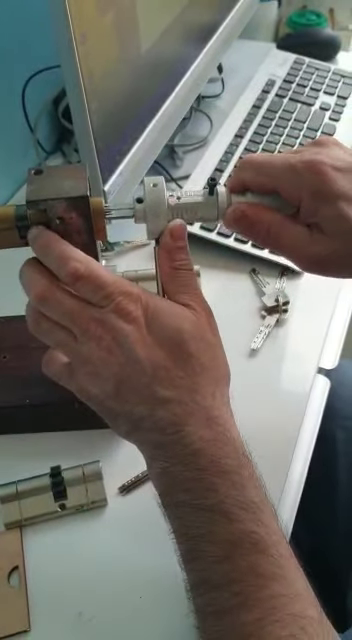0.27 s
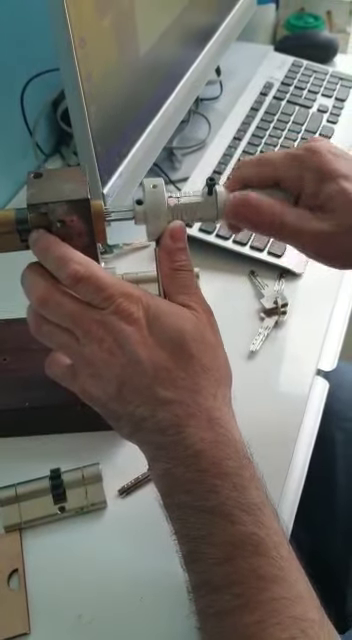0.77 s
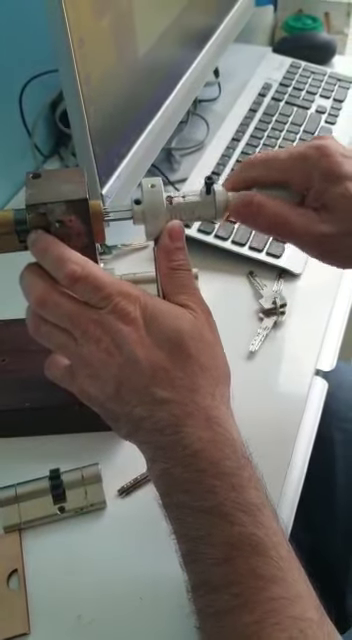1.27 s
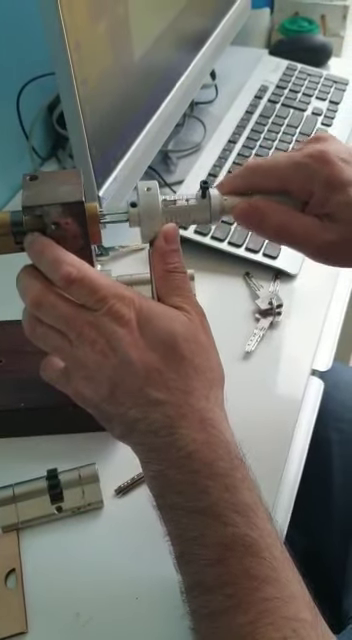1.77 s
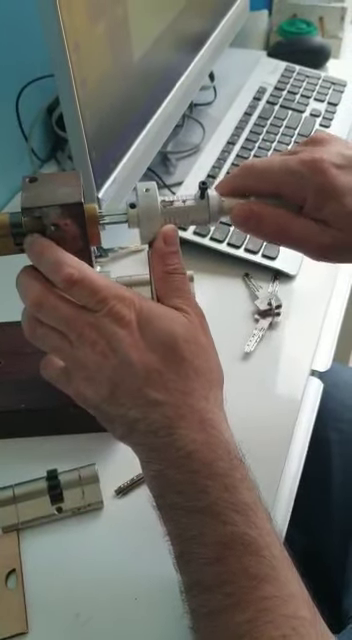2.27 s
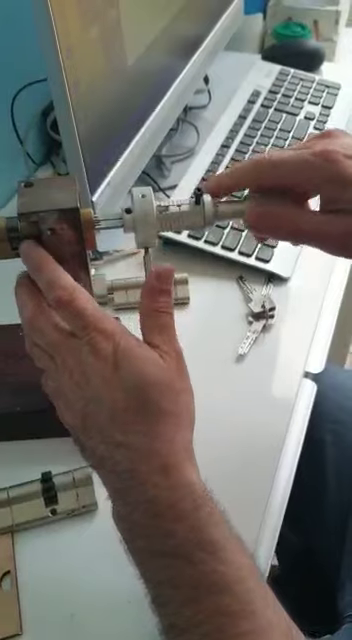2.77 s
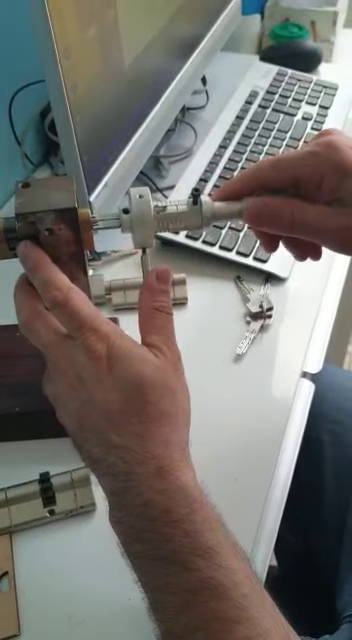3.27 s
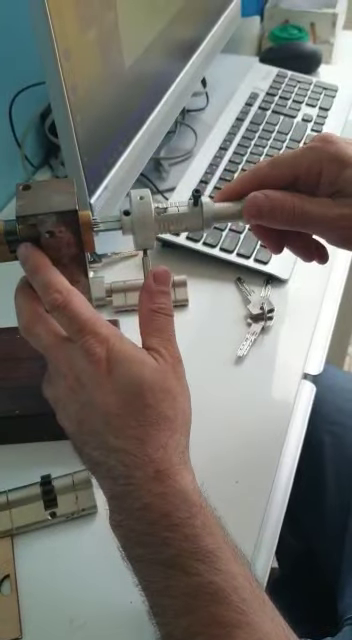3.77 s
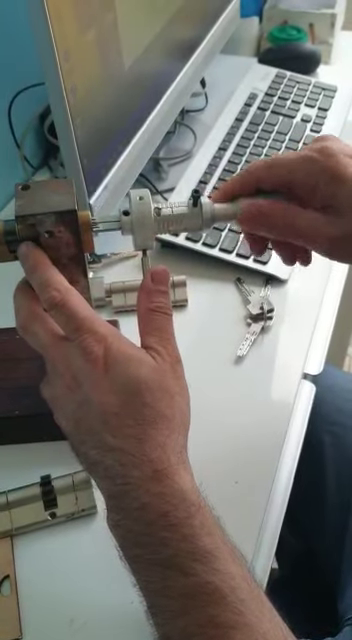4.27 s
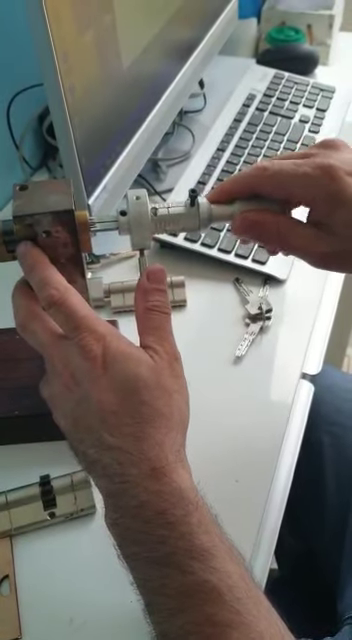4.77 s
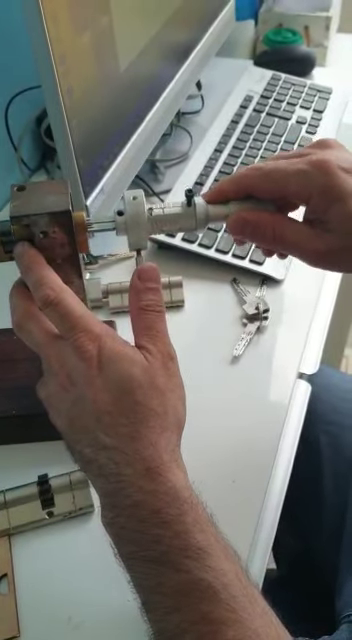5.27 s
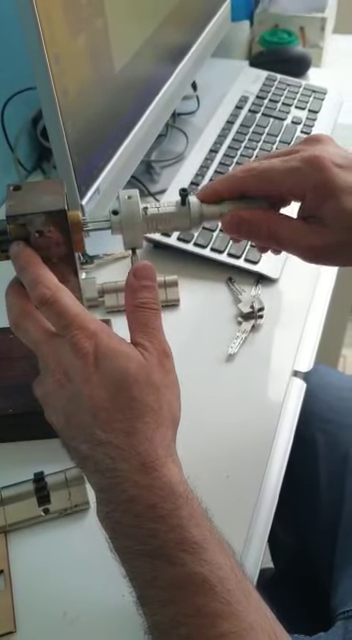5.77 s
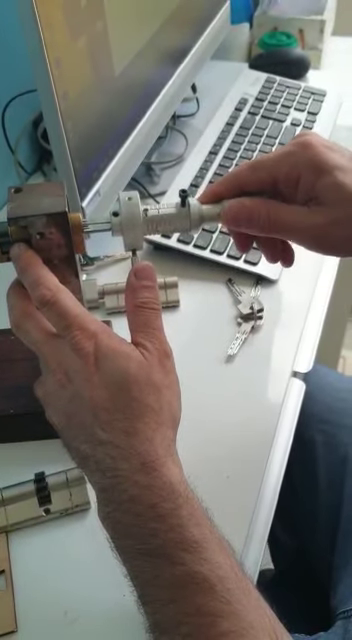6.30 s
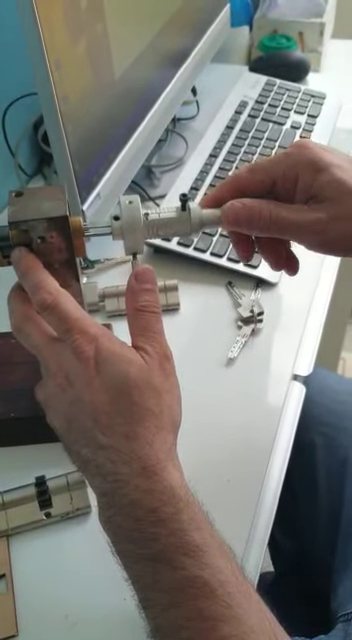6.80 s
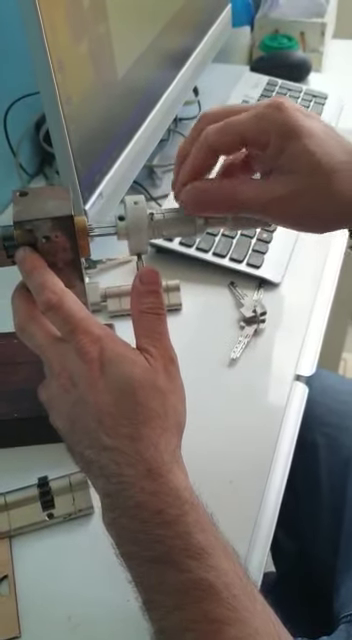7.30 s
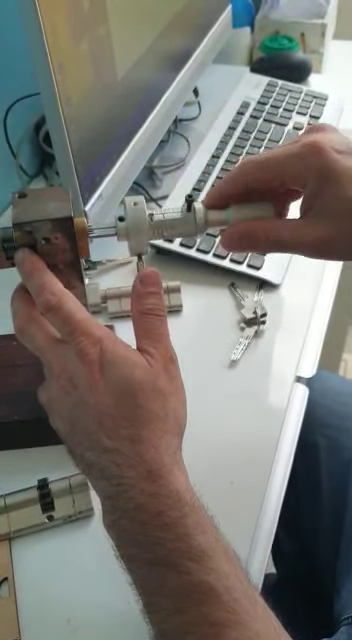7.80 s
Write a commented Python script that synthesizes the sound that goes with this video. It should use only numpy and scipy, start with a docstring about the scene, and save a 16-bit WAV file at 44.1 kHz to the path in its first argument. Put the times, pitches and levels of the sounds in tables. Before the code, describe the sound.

A pick tool works inside a metal lock cylinder in a small room. Pins land with sharp, lightly ringing clicks, and the shaft rubs with a thin squeal. A run of short high squeaks and a dry scrape follows, then more scattered squeaks and clicks. The sounds are close, with a brief echo. A fan hums throughout, and faint low engine drones come and go outside.

```python
"""At a desk in a small room, a pick tool is worked inside a lock cylinder held in a vice.
A fan hums throughout over soft room noise, and low drones, like engines outside, come and go.
Each push of the hand builds and lets go: the shaft rubs, the pick scrapes, and steel sticks and
slips on brass so quickly that it squeaks. Pins land with clicks that set the lock ringing.
The sounds of the lock bounce briefly around the room and reach two microphones."""
import sys
import numpy as np
from scipy import signal
from scipy.fft import rfft, irfft, next_fast_len
from scipy.io import wavfile

SR = 44100
rng = np.random.default_rng(int(sys.argv[2]) if len(sys.argv) > 2 else 0)


def wav_record(signal):
    """Record a signal, one row per channel, as 16-bit PCM in the file named by sys.argv[1]."""
    frames = np.transpose(np.atleast_2d(signal))
    bounded = np.clip(frames, -1, 1)
    # unit amplitude maps onto the largest positive 16-bit level
    quanta = np.round(bounded * 32767).astype(np.int16)
    wavfile.write(sys.argv[1], SR, quanta)


N = 354696

# Levels in these tables are relative: the functions turn each layer up or down as a whole.
# The fan's steady tones. Each row: pitch in Hz, level in dB.
FAN_TONES = [(62, -56.5), (122, -56), (156, -57.5), (240, -67.5), (304, -69), (366, -70), (376, -70.5),
             (424, -67), (483, -71.5), (544, -73), (596, -73)]
# How the fan's main tone swells and dips. Each row: time in seconds, level in dB.
FAN_SWELL = [(0.0, -54.5), (0.76, -62.5), (1.16, -49), (2.28, -53.5), (2.51, -71.5), (3.52, -49.5),
             (4.32, -50), (5.01, -69), (5.49, -49), (6.02, -63.5), (6.56, -51), (8.04, -50.5)]
# An engine outside idles, then speeds up. Each row: time in seconds, crank turns per second.
ENGINE_SPEED = [(0.0, 37.1), (0.33, 40.96), (1.72, 40.38), (1.81, 39.0), (2.8, 41.0), (2.89, 38.46),
                (3.56, 39.45), (3.76, 44.9), (4.86, 51.72), (5.42, 50.15), (5.98, 54.68), (6.07, 59.95),
                (6.7, 62.12), (8.04, 60.46)]
# How loud the engine is. Each row: time in seconds, level in dB.
ENGINE_LEVEL = [(0.0, -58.5), (0.51, -55), (2.75, -49.5), (3.24, -38), (3.31, -43.5), (3.74, -36.5),
                (3.83, -51), (6.45, -45.5), (6.49, -36), (6.81, -33), (7.03, -41.5), (7.63, -37.5),
                (7.7, -53), (7.9, -36), (8.04, -53)]
# The engine's tones. Each row: multiple of the crank speed, level in dB.
ENGINE_TONES = [(1, -6.5), (2, 1), (3, 3.5), (4, -7.5)]
# What the walls let through. Each row: frequency in Hz, gain in dB.
WALLS = [(38, -6), (62, 1.5), (80, -5), (100, 1), (122, -1), (138, 0.5), (160, -6), (185, -20.5),
         (245, -14)]
# Other low drones. Each row: start, rise and fade in seconds, first and last pitch in Hz, level in dB.
DRONES = [(0, 0.16, 4.5, 99.5, 96.3, -48.5), (2.401, .45, 0.24, 70, 65.5, -47.5),
          (3.0, .25, 1.4, 36.63, 51.94, -43.5), (4.4, .45, 1.1, 53.46, 86.4, -39.5)]
# The deep part of the room noise. Each row: frequency in Hz, level in dB.
RUMBLE_COLOUR = [(20, -36.5), (32, -21), (45, 8), (70, 12), (95, 5.5), (125, 8.5), (155, 13.5), (175, -1.5),
                 (205, -24.5), (300, -50)]
# The airy part of the room noise. Each row: frequency in Hz, level in dB.
AIR_COLOUR = [(100, -0.5), (210, -1), (400, -3.5), (560, -6.5), (750, -9.5), (930, -7), (1050, -13),
              (1200, -8.5), (1650, -16), (2100, -29.5), (3200, -36), (9000, -54), (11500, -38),
              (16000, -38)]
# How alike that noise is left and right. Each row: frequency in Hz, likeness from 0 to 1.
LIKENESS = [(30, .99), (70, 0.63), (140, 0.96), (250, 0.73), (500, 0.41), (1000, 0.0046), (16000, 0)]
# The shaft slides in its sleeve. Each row: start, build and let-go in seconds, level in dB.
SLIDES = [(0, 0.0076, 0.35, -71.5), (.19, 0.027, 0.3, -73.5), (1.24, 0.14, 0.21, -58),
          (1.5, 0.22, .08, -67.5), (2.25, 0.09, 1, -74), (4.36, 0.11, 0.43, -65.5), (4.6, 0.29, 0.15, -64),
          (7.1, 0.15, 0.35, -65.5)]
# The hiss of that sliding. Each row: frequency in Hz, level in dB.
SLIDE_COLOUR = [(700, -1), (1100, 16.5), (1800, 2), (2400, 5), (2850, -5.5), (3300, -1), (3900, 2.5),
                (5000, 11.5), (7000, -1.5), (8500, -28), (11000, -22), (16000, -32)]
# Pins clicking. Each row: start in seconds, then levels in dB of the ring, low knock and bright edge.
CLICKS = [(0.1812, -60.5, -68, -83), (.224, -45, -50.5, -65), (0.548, -71, -64, -79),
          (0.741, -77, -67, -76), (1.004, -71, -71.5, -68), (1.376, -73, -58, -55),
          (1.4482, -44, -63, -41.5), (2.596, -44.5, -51, -37), (2.8652, -50.5, -49.5, -66),
          (3.9644, -65.5, -67, -51), (6.46, -49.5, -53.5, -53), (6.47, -50, -57.5, -53),
          (6.9837, -59.5, -54, -72), (6.992, -62, -61, -68), (7.0052, -59.5, -55, -68),
          (7.014, -53, -60, -57), (7.2444, -77, -72, -68)]
# The notes that tool and lock ring at. Each row: pitch in Hz, width in Hz, level in dB.
LOCK_RING = [(840, 430, 1), (1165, 120, 8.5), (2360, 300, 7), (3903, 810, 5.5), (5430, 300, -4.5),
             (5800, 79, 5.5), (7450, 1800, 0.5), (8064, 130, 1), (10590, 1400, -17), (11940, 760, -0.5),
             (14600, 620, 5.5), (15620, 900, -2)]
# Faint squeals of the sliding shaft. Each row: start, build and let-go in seconds,
# first, full-pressure and last pitch in Hz, level in dB, roughness (0 is smooth).
SQUEALS = [ (1.208, 0.048, 0.025, 2020, 2390, 2590, -68, 0), (1.235, 0.13, .14, 3590, 3344, 3350, -57, .8),
           (1.51, .095, 0.027, 2550, 2495, 2470, -66, 0.2), (1.595, .045, .15, 2550, 2356, 2199, -66.5, 0),
           (4.42, .03, .22, 2570, 2430, 2007, -63, 0.5), (4.46, .05, .25, 3300, 3200, 3000, -72.5, 0.4),
           (4.76, 0.12, .09, 4030, 3820, 3750, -72, 0.05),
           (4.762, 0.086, 0.13, 3160, 3230, 3180, -66.5, 0.23),
           (7.11, 0.055, 0.134, 2400, 2220, 2130, -68, 0.2), (7.16, 0.11, 0.34, 3280, 3160, 3080, -72, 0.3),
           (7.36, .08, 0.21, 2607, 2518, 2360, -72.5, 0.04)]
# Squeaks of steel on brass. Each row: the same eight values as a squeal,
# then the change in dB from one overtone to the next, and the pick's ring in dB.
SQUEAKS = [ (1.445, 0.0067, 0.006, 1685, 2040, 2234, -28, 1.06, 0.6, -11.5),
           (1.705, 0.014, 0.028, 3865, 3927, 3860, -21, 0.07, -4.5, -33),
           (3.111, 0.016, 0.035, 2530, 2980, 3020, -35, 0.92, -1, -5),
           (3.239, 0.024, 0.025, 2790, 3248, 3060, -40, 0.79, -3.5, -29),
           (3.371, 0.023, 0.027, 2850, 2650, 2916, -38, 0.59, -1, -21),
           (4.037, 0.006, 0.025, 2700, 2656, 3010, -42.5, 0.78, .5, 7),
           (4.263, .04, 0.0565, 2814, 3080, 2974, -30.5, .55, 0.5, -12),
           (4.356, 0.0204, 0.03, 2600, 2450, 2528, -39, 1.06, 0, -17),
           (4.385, 0.011, 0.028, 2580, 2470, 2580, -46, 1.23, -9, -2.5),
           (6.034, 0.011, 0.011, 3833, 3890, 3770, -36.5, .06, -13, -45),
           (6.117, 0.0069, 0.023, 3890, 3730, 3770, -30, 0.12, -6.5, -45),
           (6.264, 0.0041, .008, 3813, 3770, 3850, -49.5, .06, -13, -34),
           (6.342, 0.0084, 0.013, 3820, 3770, 3680, -44.5, 0.15, -14, -37),
           (6.982, .004, .014, 2691, 2701, 2740, -59, 1, -2, 10),
           (7.004, .004, 0.012, 2700, 2760, 2670, -54, 1, 7, 6.5)]
# How well the tool gives off a squeak's overtones. Each row: frequency in Hz, gain in dB.
SQUEAK_COLOUR = [(1900, -6.5), (2700, -11.5), (3050, -0.5), (3900, -2), (4800, -0.5), (5400, -3), (6100, 3),
                 (7600, -1), (8250, -2.5), (9000, -21), (11000, -16), (12000, -9.5), (13500, -9.5),
                 (15600, -3), (17500, -45)]
# The pick's own ring under a squeak. Each row: pitch in Hz, width in Hz, level in dB.
PICK_RING = [(2950, 400, -9), (8270, 110, 7), (11000, 500, -9), (15000, 300, -11)]
# Short dry scrapes of the pick. Each row: start, build and let-go in seconds, level in dB.
SCRAPES = [(3.53, 0.021, 0.15, -52.5), (3.96, 0.079, .015, -72), (4.378, 0.0036, 0.023, -52)]
# The hiss of those scrapes. Each row: frequency in Hz, level in dB.
SCRAPE_COLOUR = [(500, 0.5), (1500, 3.5), (2600, -0.5), (3300, -5), (4300, 4), (5500, -4), (7600, 1.5),
                 (8700, -15.5), (10500, -7), (13000, -20), (16000, -22)]
# How long the room echoes. Each row: frequency in Hz, seconds to fade by 60 dB.
ROOM_FADE = [(1000, .38), (4000, .3), (6000, .26), (12000, .24), (16000, .21)]
# The right microphone is shaded from the tool. Each row: frequency in Hz, gain in dB.
RIGHT_SHADE = [(1000, 5.5), (2000, 3), (3000, 1.5), (3850, -3), (4500, -4), (5400, -14), (6500, -13.5),
               (8400, -14), (9600, 2), (11000, 2.5), (13000, -13), (16000, -8)]


def from_db(db):
    """Turn decibels into a number to multiply by."""
    return 10 ** (np.asarray(db) / 20)


def unit_level(x):
    """Scale a sound so that its average strength (rms) is 1."""
    return x / np.sqrt(np.mean(x ** 2) + 1e-20)


def in_time(rows):
    """Join (time, value) points with straight lines, giving a value for every sample."""
    return np.interp(np.arange(N) / SR, *np.transpose(rows))


def at_hz(points, hz):
    """Read between (frequency, value) points, with every octave equally wide."""
    f, value = np.transpose(points)
    return np.interp(np.log(np.maximum(hz, 1)), np.log(f), value)


def coloured(x, colour):
    """Turn each frequency of a sound up or down by a curve in dB."""
    size = next_fast_len(x.shape[-1] + 2048)
    gain = from_db(at_hz(colour, np.fft.rfftfreq(size, 1 / SR)))
    return irfft(rfft(x, size) * gain, size)[..., :x.shape[-1]]


def drift(rate, size=N):
    """A random wobble of about 1 either way, with `rate` new values a second."""
    return np.interp(np.arange(size) / SR * rate, np.arange(8192), rng.standard_normal(8192))


def resonance(x, hz, width_hz):
    """Let a sound ring at one pitch; a narrower width rings longer."""
    r = np.exp(-np.pi * width_hz / SR)
    feedback = [1, -2 * r * np.cos(2 * np.pi * hz / SR), r * r]
    return signal.lfilter(np.array([1, 0, -1]) * (1 - r * r) / 2, feedback, x + 1e-18)


def add(out, start_s, sound):
    """Mix a sound in at its start time."""
    at = round(start_s * SR)
    out[at:at + len(sound)] += sound[:N - at]


def push(build_s, let_go_s):
    """A curve from 0 to 1 and back, like a hand's pressure, and flags for where it is rising."""
    up, down = [np.linspace(0, 1, int(s * SR)) for s in (build_s, let_go_s)]
    pressure = np.concatenate([up ** .65, down[::-1] ** .9])
    return pressure, np.arange(len(pressure)) < len(up)


def tone(hz, level_db):
    """A pure tone whose pitch and level can change at every sample."""
    return np.sqrt(2) * from_db(level_db) * np.sin(2 * np.pi * np.cumsum(hz) / SR)


def fan(main_hz=182.9, wander=.005, waver_db=1.3):
    """A fan hums with several tones, each wavering a little in pitch and level."""
    tones = [*FAN_TONES, (main_hz, in_time(FAN_SWELL) - 1)]
    return sum(tone(level_db=db + waver_db * drift(2.4), hz=hz * (1 + wander * drift(4)))
               for hz, db in tones)


def engine(gain_db=-4, throb_db=2):
    """An engine's low tones follow its crank, each louder where the walls let it through."""
    crank_hz, level_db = in_time(ENGINE_SPEED), in_time(ENGINE_LEVEL) + gain_db
    return sum(tone(k * crank_hz, level_db + db + at_hz(WALLS, k * crank_hz) + throb_db * drift(15))
               for k, db in ENGINE_TONES)


def drones(throb_db=1.5):
    """Single low notes swell, glide evenly and fade."""
    out = np.zeros(N)
    for start_s, rise_s, fade_s, first_hz, last_hz, level_db in DRONES:
        swell, _ = push(rise_s, fade_s)
        glide_hz = np.geomspace(first_hz, last_hz, len(swell))
        add(out, start_s, swell * tone(glide_hz, level_db + throb_db * drift(17, len(swell))))
    return out


def room_noise(colour, start_db, rise_db_per_s):
    """Slowly growing noise from all around: alike on both sides in the bass, unrelated higher up."""
    size = next_fast_len(N)
    hz = np.fft.rfftfreq(size, 1 / SR)
    shared, opposite = rfft(rng.standard_normal((2, size)))
    alike = at_hz(LIKENESS, hz)
    pair = np.sqrt(1 + alike) * shared + np.sqrt(1 - alike) * opposite * [[1], [-1]]
    noise = irfft(pair * from_db(at_hz(colour, hz)), size)[:, :N]
    return unit_level(noise) * from_db(start_db + rise_db_per_s * np.arange(N) / SR)


def rub(pushes, colour, grain_db, gain_db):
    """Sliding metal hisses with a fine uneven grain, louder the harder it is pressed."""
    force = np.zeros(N)
    for start_s, build_s, let_go_s, level_db in pushes:
        add(force, start_s, from_db(level_db) * push(build_s, let_go_s)[0])
    hiss = unit_level(coloured(rng.standard_normal(N), colour))
    return force * hiss * from_db(gain_db + grain_db * drift(300))


def pin_clicks(fade_s=.028, snap=4.1):
    """A pin lands with a sharp crack of tiny contacts that sets the lock ringing."""
    out, t = np.zeros(N), np.arange(SR // 16) / SR
    for start_s, ring_db, knock_db, edge_db in CLICKS:
        crack = rng.standard_normal(len(t)) * from_db(-60 * t / fade_s)
        crack[0] += snap
        # Four bands, each with its own level, make a click brighter or duller.
        bands = [(0, 1800, knock_db + 1), (1800, 4500, ring_db - 6),
                 (4500, 9500, ring_db), (9500, SR, edge_db - 1)]
        for low_hz, high_hz, level_db in bands:
            ring = sum((-1) ** k * from_db(db) * resonance(crack, hz, width)
                       for k, (hz, width, db) in enumerate(LOCK_RING) if low_hz <= hz < high_hz)
            add(out, start_s, from_db(level_db) * ring / np.std(ring[:SR // 250]))  # set by first 4 ms
    return out


def squeak(build_s, let_go_s, first_hz, full_hz, last_hz, level_db, rough, tilt_db, ring_db,
           jitter, flutter_db, grit_db):
    """Metal sticks and slips, making a note; rough contact shakes it, adds grit and rings the pick."""
    pressure, building = push(build_s, let_go_s)
    hz = full_hz * pressure + np.where(building, first_hz, last_hz) * (1 - pressure)
    size = len(hz)
    shake = drift(1800, size) + drift(350, size) + .6 * drift(140, size)
    slip_hz = hz * (1 + jitter * rough * shake)
    note = sum(tone(k * slip_hz, at_hz(SQUEAK_COLOUR, k * hz) + tilt_db * (k - 1))
               for k in range(1, int(SR / 2 / hz.max()) + 1))
    grit = unit_level(coloured(rng.standard_normal(size), SQUEAK_COLOUR))
    ring = sum(from_db(db) * resonance(rng.standard_normal(size), f, width)
               for f, width, db in PICK_RING)
    sound = unit_level(note) + from_db(grit_db) * rough * grit + from_db(ring_db) * unit_level(ring)
    return sound * pressure * from_db(level_db + flutter_db * rough * drift(400, size))


def stick_slip(rows, gain_db, **settings):
    """Each push makes one squeak or squeal, its pitch and loudness following the pressure."""
    out = np.zeros(N)
    for start_s, *shape in rows:
        add(out, start_s, squeak(*shape, **settings))
    return from_db(gain_db) * out


def room(x, echo_db=-.5, right_direct_db=-6, build_s=.001):
    """The left microphone faces the tool; both hear dense echoes, which die sooner in the treble."""
    t = np.arange(SR // 2) / SR
    noise, hz = rfft(rng.standard_normal((2, len(t)))), np.fft.rfftfreq(len(t), 1 / SR)
    edges_hz = np.linspace(0, SR / 2, 12)
    tail = np.zeros((2, len(t)))
    for low, high in zip(edges_hz, edges_hz[1:]):
        band = irfft(noise * (hz >= low) * (hz < high), len(t))
        tail += band * from_db(-60 * t / at_hz(ROOM_FADE, (low + high) / 2))
    tail *= 1 - np.exp(-(t / build_s) ** 2)
    tail /= np.sqrt(np.sum(tail ** 2, axis=1, keepdims=True))
    left, right = from_db(echo_db) * signal.fftconvolve(x[None], tail, axes=1)[:, :N]
    return np.array([x + left, coloured(from_db(right_direct_db) * x + right, RIGHT_SHADE)])


def background(right_lag_s=.00032):
    """Fan, engines and room noise reach the right side a little later, the bass a little stronger."""
    bass = fan() + engine() + drones() + room_noise(RUMBLE_COLOUR, -46.5, rise_db_per_s=.35)
    bass[1] = coloured(bass[1], [(30, .83), (65, 2.7), (120, -.077)])
    left, right = from_db(.5) * bass + room_noise(AIR_COLOUR, -55.5, rise_db_per_s=.4)
    late_right = np.interp(np.arange(N) - right_lag_s * SR, np.arange(N), right)
    return np.array([left, late_right])


def scene():
    """The tool works the lock in the room, over hum, drones and room noise."""
    backdrop = background()
    slides = rub(SLIDES, SLIDE_COLOUR, grain_db=2.5, gain_db=-2)
    clicks = pin_clicks()
    squeals = stick_slip(SQUEALS, gain_db=-2.5, jitter=.08, flutter_db=5, grit_db=-20,
                         tilt_db=-9, ring_db=-35)
    squeaks = stick_slip(SQUEAKS, gain_db=-6, jitter=.032, flutter_db=4, grit_db=-22)
    scrapes = rub(SCRAPES, SCRAPE_COLOUR, grain_db=4, gain_db=-4.5)
    return backdrop + room(slides + clicks + squeals + squeaks + scrapes)


def record(dry):
    """The highest treble, above 16000 Hz, is cut away steeply."""
    return signal.sosfilt(signal.ellip(12, .1, 80, 16000, fs=SR, output="sos"), dry)


dry = scene()
out = record(dry)
wav_record(out)
```